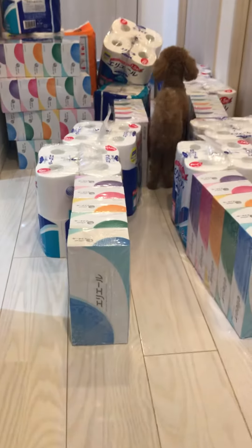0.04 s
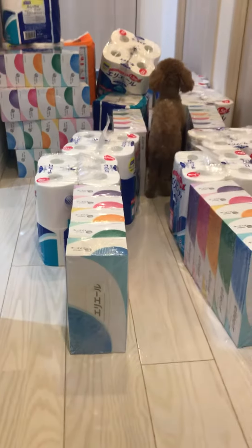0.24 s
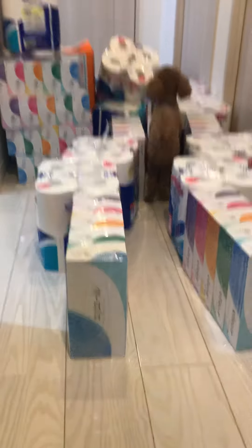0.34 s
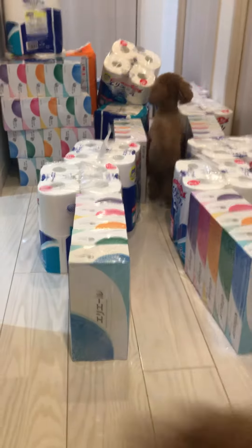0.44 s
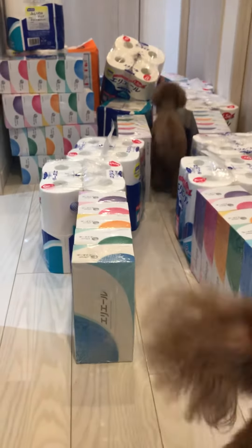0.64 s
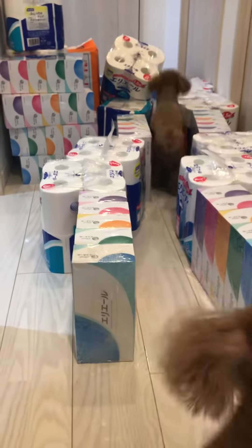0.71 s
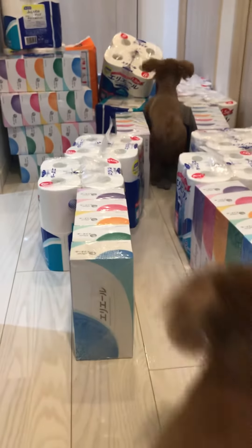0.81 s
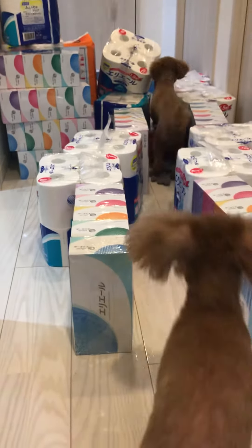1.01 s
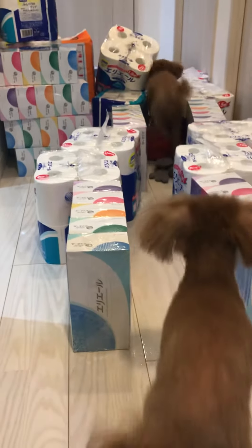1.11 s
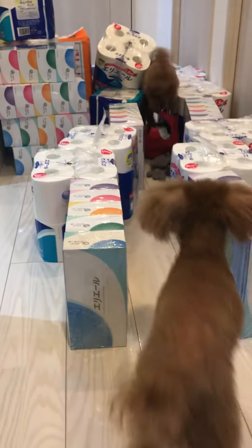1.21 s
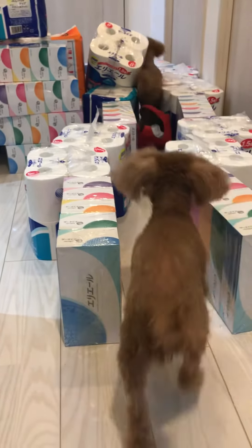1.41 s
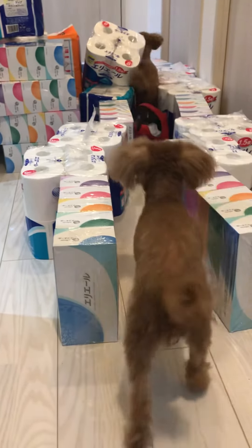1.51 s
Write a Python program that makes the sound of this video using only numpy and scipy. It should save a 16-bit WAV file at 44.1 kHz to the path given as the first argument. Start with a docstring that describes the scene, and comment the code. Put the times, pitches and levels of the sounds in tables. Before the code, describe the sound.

A small dog's claws click on a hard floor nearby. Faint ticks lead to two sharp clicks and a hollow knock around 0.2 to 0.3 seconds. Lighter, uneven taps follow with soft paw thuds and faint scuffs. A heavier landing makes a dull thump at about 1.1 seconds, then quieter steps continue to 1.5 seconds. The room has a low hush and a slight echo.

```python
"""A faint pad scuff and a claw click come first, over a low hush: a small dog walks on laminate nearby.
Hard claws excite the high modes of board and claw, padded toes knock on the hollow board, and sliding
pads rustle by friction. Paw weight drives the low modes of the floor; one heavier landing booms.
The quiet room adds one wall echo and a short reverberant tail."""
import sys
import numpy as np
from scipy import signal
from scipy.fft import rfft, irfft
from scipy.io import wavfile
from scipy.ndimage import uniform_filter1d

SR = 44100
rng = np.random.default_rng(int(sys.argv[2]) if len(sys.argv) > 2 else 0)


def generate_wav(signal):
    """Clip the signal to [-1, 1] and save it as 16-bit WAV at the path in sys.argv[1]."""
    frames = np.transpose(np.atleast_2d(signal))
    scaled = np.clip(frames, -1, 1) * 32767
    pcm = np.round(scaled).astype(np.int16)
    wavfile.write(sys.argv[1], SR, pcm)


N = 68355


def undb(db):
    return 10 ** (np.asarray(db) / 20)


def unit_rms(x):
    return x / np.sqrt(np.mean(x ** 2))


def add(out, start_s, x):
    """Superposition: x joins the mix at start_s."""
    i = int(round(start_s * SR))
    x = x[max(-i, 0):N - i]
    out[max(i, 0):max(i, 0) + len(x)] += x


def ring(hz, db, t60, length_s):
    """Free vibration: a sum of exponentially damped modes."""
    t = np.arange(int(length_s * SR))[:, None] / SR
    return np.sum(undb(db - 60 * t / t60) * np.sin(2 * np.pi * hz * t), axis=1)


def bell(hz, centre_hz, octaves):
    """Band-pass gain in dB, 10 dB down at the given octaves from the centre."""
    return -10 * (np.log2(np.maximum(hz, 1) / centre_hz) / octaves) ** 2


def colour(x, gain_db):
    """Linear filtering: the spectrum is weighted by gain_db(f)."""
    return irfft(rfft(x) * undb(gain_db(np.fft.rfftfreq(len(x), 1 / SR))), len(x))


def pad_scuffs():
    """Sliding friction: a dragging pad sheds dense, uneven impulses that swell, stutter and fade."""
    # pad slides: t/s, duration/s, level/dB, centre f/Hz, half-width/octaves
    slides = [(-.02, 0.017, -38, 2700, 1.3), (0.089, 0.033, -45, 3960, 1.4), (0.103, 0.023, -43, 736, 1.44),
              (0.256, 0.023, -34, 2080, 1.42), (0.411, 0.099, -45.5, 4400, 4.7),
              (0.482, 0.058, -35, 3600, 1.54), (0.499, 0.024, -38, 2860, 0.31),
              (0.499, 0.09, -45, 695, 1.36), (0.544, 0.1, -51.5, 5000, 3.1),
              (0.693, 0.091, -51.5, 2300, 2.6), (1.096, 0.055, -46, 1030, 1.68),
              (1.157, 0.024, -49, 272, 0.49), (1.395, 0.039, -45.5, 870, 1.42),
              (1.477, 0.057, -56.5, 2420, 2.2), (1.483, 0.15, -53, 254, 0.27)]
    grains_per_s, scatter_db, stutter_db, stutter_s = 8000, 1.4, 3, 0.004
    out, t = np.zeros(N), np.arange(8192) / SR
    for start, duration, db, hz, octaves in slides:
        chance, polarity, size, grip = rng.random((4, len(t)))
        grains = (chance < grains_per_s / SR) * np.sign(polarity - .5)
        grains *= undb(-scatter_db * np.log(1e-4 + size))
        rustle = unit_rms(colour(grains, lambda f: bell(f, hz, octaves)))
        grip_db = stutter_db * unit_rms(uniform_filter1d(grip - .5, size=int(stutter_s * SR)))
        age = t / (0.36 * duration)  # the swell peaks at age 1
        add(out, start, undb(db + grip_db) * rustle * age * np.exp(1 - age))
    return out


def hush():
    """Stationary noise: the steady hiss of room and microphone."""
    # noise spectrum: f/Hz, relative spectral level/dB
    spectrum = [(25, -24), (50, -11), (95, -6.5), (445, -19), (979, -17), (1150, -16.5), (1930, -24),
                (2330, -23.5), (6920, -27.5), (9000, -29), (10600, -33.5), (12000, -30.5), (15200, -35),
                (16500, -63)]
    hz, db = np.array(spectrum).T
    hiss = colour(rng.standard_normal(N), lambda f: np.interp(np.log(f + 1), np.log(hz), db, left=-60))
    return undb(-52.5) * unit_rms(hiss)


def claw_clicks():
    """Impact excitation: chattering contact rings board and claw. Returns clicks and bare cracks."""
    # claw strikes: t/s, level/dB, favoured f/Hz, treble gain/dB, low-mid gain/dB, contact time/s
    strikes = [(0.0034, -35.5, 4500, -21, 14, 0.0031), (0.102, -27.5, 7700, 3.5, -14, 0.0029),
               (0.1204, -32.5, 4590, -17, 17, 0.0044), (0.1374, -30, 4600, -14, 10.5, 0.0026),
               (0.2264, -5, 11460, -3.5, 5.5, 0.0016), (0.2542, -25, 4120, -25, 3, 0.0019),
               (0.3195, -7, 9600, -1.5, 8, 0.0011), (0.411, -30.5, 5300, -20, 13.5, 0.0067),
               (0.4245, -29.5, 9400, -5, -18, 0.0031), (0.475, -32, 6800, -27, 5, 0.0026),
               (0.4829, -19, 7000, -5.5, 17, 0.0012), (0.608, -25, 14300, -1, 9, 0.0028),
               (0.6707, -20.5, 7300, -3, 4.5, 0.0043), (0.6904, -25, 8840, -3.5, 3, 0.005),
               (0.842, -29.5, 7640, -4.5, 0, 0.0031), (0.8515, -28, 6180, -2.5, 5.5, 0.0048),
               (0.971, -44.5, 6260, -1, -6, 0.0037), (0.9785, -36, 9300, 4, -1, 0.0039),
               (0.9866, -44.5, 4600, -7, -11, 0.0021), (1.0663, -20.5, 9200, 2, 14.5, 0.0011),
               (1.0902, -24, 5360, -6.5, 13.5, 0.006), (1.219, -42, 10000, -4, -6, 0.0022),
               (1.2271, -36.5, 10700, -1, 15, 0.003), (1.3421, -38.5, 9700, 0.5, 15, 0.015),
               (1.3652, -26, 7790, -4.5, 7.5, 0.0014), (1.3704, -30, 6660, 5, 16, 0.005),
               (1.5357, -42.5, 8750, 2, -6, 0.0042)]
    # modes of board and claw: f/Hz, level/dB, T60/s
    modes = [(1300, -6, .006), (2600, -5, .007), (3200, -7, .004), (4600, -1, .014), (5650, -1, .007),
             (6520, 1, .006), (7500, -2, .004), (8600, -3, .004), (9330, -1, .005), (10300, -2, .003),
             (11430, 1, .004), (12600, -2, .003), (13900, -1, .003), (15100, -3, .003)]
    treble_hz, lowmid_hz, favour_db = 9900, 3600, 8
    touch_s, touch_db, strike_db = 0.0009, -15, 10
    hz, db, t60 = np.array(modes).T
    clicks, cracks = np.zeros(N), np.zeros(N)
    since_strike = np.arange(600) / SR - touch_s  # a light touch precedes the strike
    polarity = (-1) ** np.arange(len(hz))  # neighbouring modes start in antiphase
    for start, level_db, favoured_hz, treble_db, lowmid_db, contact_s in strikes:
        fade = np.exp(-np.abs(since_strike / contact_s) ** 0.9)
        force = rng.standard_normal(len(fade)) * np.where(since_strike < 0, undb(touch_db), fade)
        force[np.argmax(since_strike >= 0)] = undb(strike_db)
        mode_db = db + treble_db * (hz > treble_hz) + lowmid_db * (hz < lowmid_hz)
        mode_db += favour_db * undb(bell(hz, favoured_hz, octaves=0.17))
        mode_hz = polarity * hz * (1 + 0.012 * rng.standard_normal(len(hz)))
        click = np.convolve(force, np.diff(ring(mode_hz, mode_db, t60, length_s=.03)))
        peak_rms = np.sqrt(uniform_filter1d(click ** 2, size=60).max())
        click *= undb(level_db) / (2 * peak_rms)
        # fourfold damping broadens the resonances; the crack carries the click's energy
        crack = np.diff(ring(mode_hz, mode_db, t60 / 4, length_s=.03))
        crack *= np.sqrt(np.sum(click ** 2) / np.sum(crack ** 2))
        add(clicks, start, click)
        add(cracks, start + touch_s, crack)
    return clicks, cracks


def toe_knocks():
    """Cushioned impact: the toe pad low-passes an uneven force that rings the hollow board."""
    # toe impacts: t/s, peak level/dB, f/Hz, T60 of the lowest partial/s
    impacts = [(0.009, -43.5, 420, 0.04), (0.089, -36.5, 634, 0.086), (0.1, -40.5, 470, 0.065),
               (0.109, -31, 1160, 0.012), (0.229, -17.5, 470, 0.013), (0.235, -22, 647, 0.039),
               (0.2565, -18.5, 1215, 0.034), (0.2613, -18, 1240, 0.024), (0.267, -21, 990, 0.024),
               (0.289, -23, 760, 0.021), (0.32, -46, 393, 0.019), (0.486, -36.5, 763, 0.12),
               (0.508, -25.5, 1400, 0.02), (0.61, -27.5, 368, 0.009), (0.76, -37.5, 340, 0.021),
               (1.04, -33.5, 443, 0.01), (1.0455, -39.5, 505, 0.014), (1.107, -36, 335, 0.067),
               (1.269, -42.5, 380, 0.013), (1.4, -43, 353, 0.045), (1.42, -42, 1220, 0.035)]
    # board partials: frequency ratio, level/dB
    partials = [(1, 1), (1.45, -17.5), (2.1, -4.5)]
    out, (ratio, db) = np.zeros(N), np.array(partials).T
    age = np.arange(200) / SR / 0.0003  # the contact swells for 0.3 ms
    for start, peak_db, pitch_hz, t60 in impacts:
        force = rng.standard_normal(len(age)) ** 2 * age * np.exp(-age)
        padded = np.convolve(force, np.hanning(14))
        hz = pitch_hz * ratio * (1 + 0.02 * rng.standard_normal(len(ratio)))
        wood = ring(hz, db, t60 / np.sqrt(ratio), length_s=.1)
        knock = np.diff(np.convolve(padded, wood))
        add(out, start, undb(peak_db) * knock / np.abs(knock).max())
    return out


def paw_thuds():
    """Resonance: a soft push of paw weight sets the floor modes near the paw's pitch booming."""
    # paw landings: t/s, peak level/dB, favoured f/Hz, push duration/s
    landings = [(0.02, -50.5, 65.7, 0.021), (0.089, -60, 88.5, 0.0043), (0.23, -35, 200, 0.0055),
                (0.269, -29, 180, 0.0015), (.281, -35.5, 130, 0.0069), (.292, -26.5, 137, 0.006),
                (0.324, -31, 182, 0.0016), (0.367, -39.5, 53.3, 0.018), (0.492, -27, 131, 0.0029),
                (0.564, -28.5, 126, 0.0032), (0.609, -31.5, 121, 0.0085), (0.68, -35.5, 107, 0.0033),
                (0.83, -42.5, 60.6, 0.012), (0.932, -42, 145, 0.012), (1.002, -41, 132, 0.0024),
                (1.038, -38, 240, 0.0028), (1.105, -19, 82.5, 0.0032), (1.129, -17.5, 89, 0.0047),
                (1.164, -21, 90.4, 0.0046), (1.212, -24.5, 55, 0.012), (1.275, -38, 148, 0.0061),
                (1.31, -33.5, 49.5, 0.012), (1.35, -44.5, 224, 0.0041), (1.401, -28, 101.5, 0.0029),
                (1.471, -27, 128, 0.006), (1.498, -28.5, 134, 0.0074)]
    # floor modes: f/Hz, level/dB, T60/s
    floor_modes = [(45.3, -4.5, 0.57), (66.3, -10.5, 0.66), (79.1, 6.5, 0.16), (108.24, -2, 0.53),
                   (124.7, 0.5, 0.32), (161.1, 11, 0.19), (206.5, 31.5, 0.0346), (247, -3, 0.098),
                   (325, -8, 0.087)]
    out, (hz, db, t60) = np.zeros(N), np.array(floor_modes).T
    swell_s = 0.0029
    for start, peak_db, pitch_hz, push_s in landings:
        push = np.hanning(int(push_s * SR) + 3)
        floor = ring(hz, db + bell(hz, pitch_hz, octaves=0.56), t60, length_s=0.75)
        boom = np.convolve(push, floor)
        boom *= 1 - np.exp(-np.arange(len(boom)) / SR / swell_s)
        add(out, start, -undb(peak_db) * boom / np.abs(boom).max())
    return out


def room_tail(x):
    """Reverberation: a diffuse field decays exponentially, the treble sooner than the bass."""
    # reverberant bands: f/Hz, level/dB, T60/s
    bands = [(156, 5.5, 0.61), (520, -7.5, 0.44), (1540, -7.5, 0.37), (4440, -4, 0.15), (9900, -12, 0.24)]
    t, tail, rise_s = np.arange(SR // 2) / SR, 0, 0.00067
    for hz, db, t60 in bands:
        noise = colour(rng.standard_normal(len(t)), lambda f: bell(f, hz, octaves=1))
        envelope = undb(-60 * t / t60) * (1 - np.exp(-t / rise_s))
        energy_norm = np.sqrt(2 * np.log(1000) / t60 / SR)
        tail += undb(db) * noise * envelope * energy_norm
    return signal.fftconvolve(x, tail)[:N]


def scene():
    """Superposition of direct sound, reflections and hush; the cracks sound only through the room."""
    boom = paw_thuds()
    clicks, cracks = claw_clicks()
    paws = toe_knocks() + pad_scuffs()
    reflections = room_tail(cracks + undb(-9) * clicks + paws + undb(-17) * boom)
    add(reflections, 0.012, undb(-16) * (clicks + paws))  # one wall echo
    return (clicks + paws + boom + reflections + hush())[None]


def record(dry):
    """Band limiting: the deepest bass and the treble above 16 kHz are cut."""
    low_hz, high_hz = 45, 16000
    highpass = signal.butter(3, low_hz, "high", fs=SR, output="sos")
    lowpass = signal.ellip(10, .2, 80, high_hz, fs=SR, output="sos")
    return signal.sosfilt(lowpass, signal.sosfilt(highpass, dry))


dry = scene()
out = record(dry)
generate_wav(out)
```